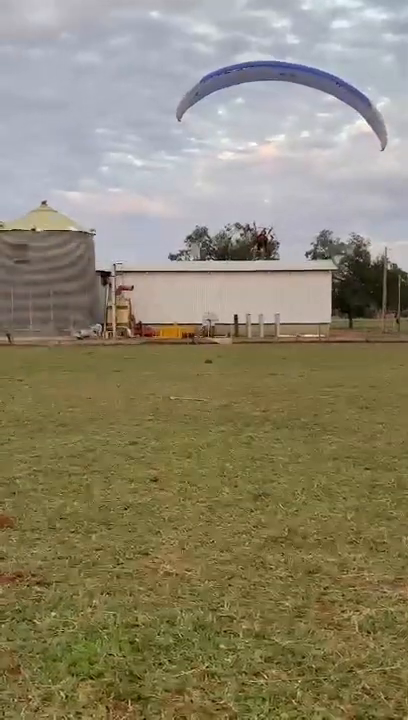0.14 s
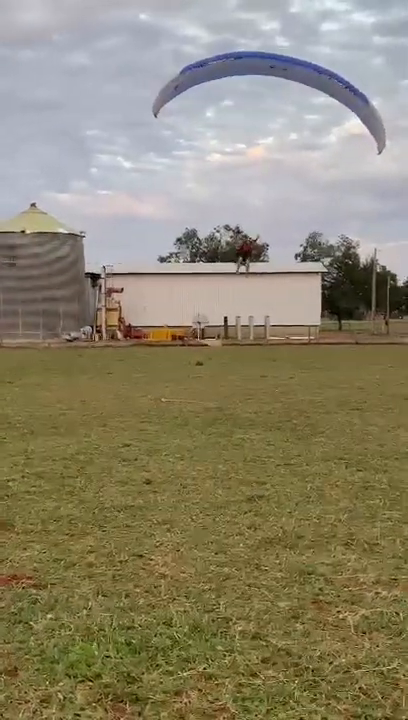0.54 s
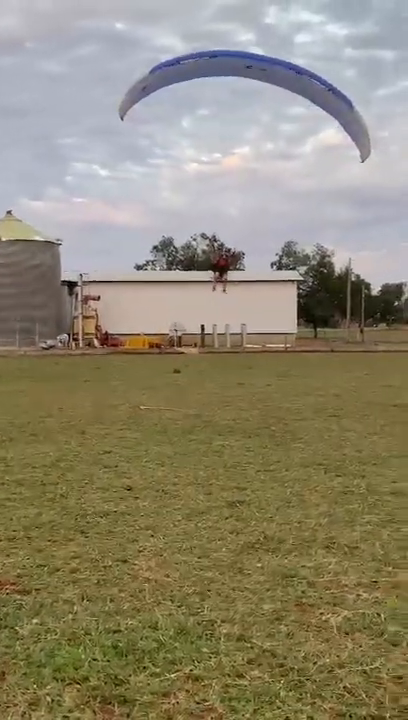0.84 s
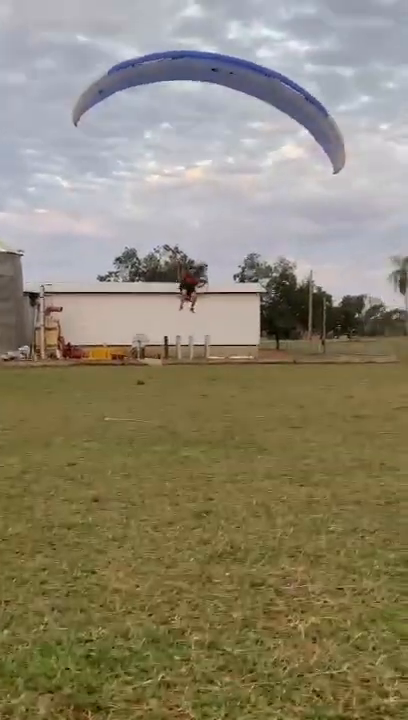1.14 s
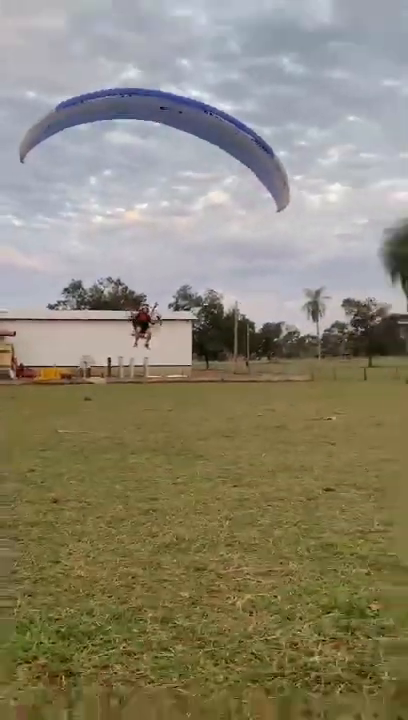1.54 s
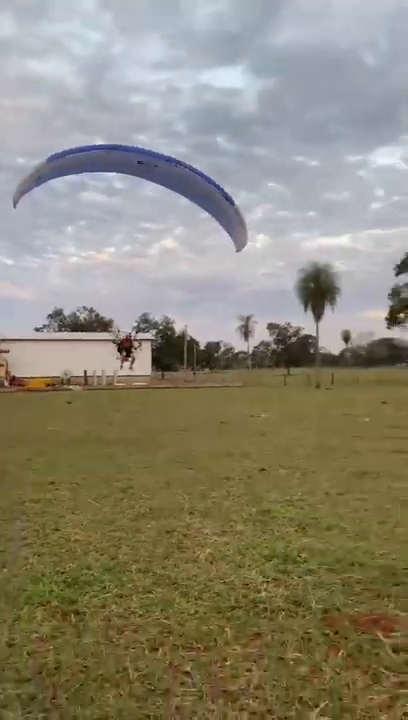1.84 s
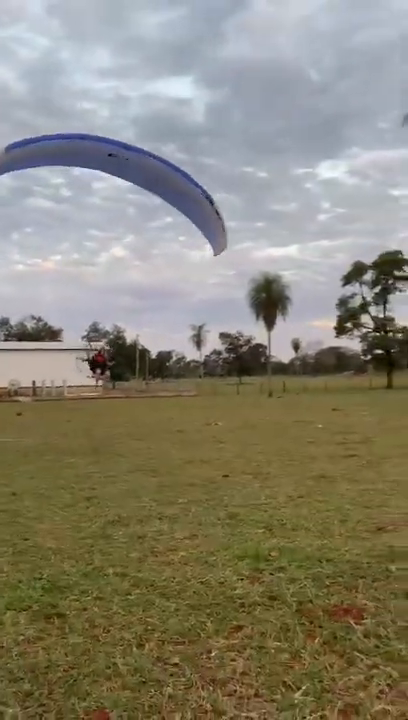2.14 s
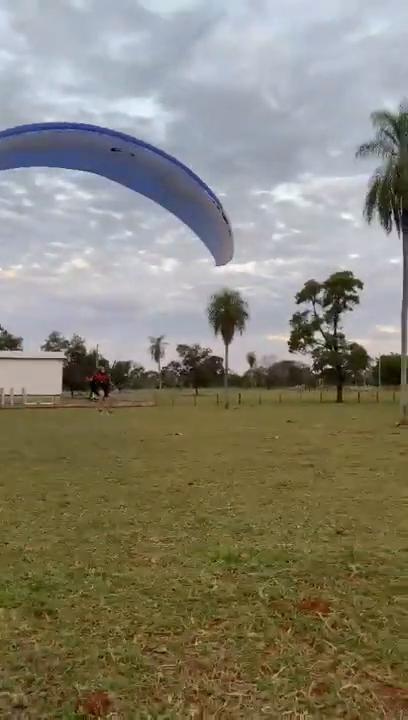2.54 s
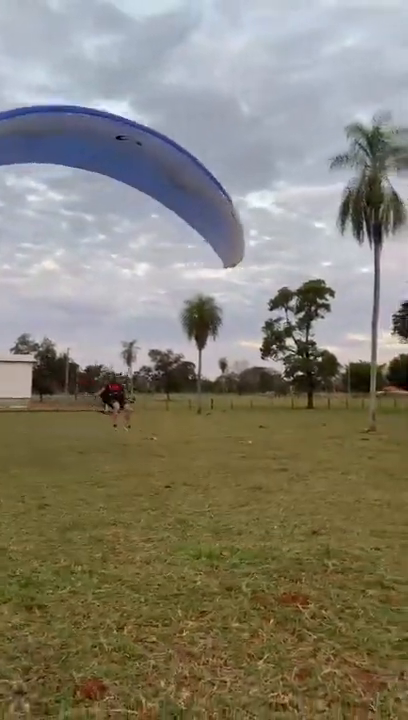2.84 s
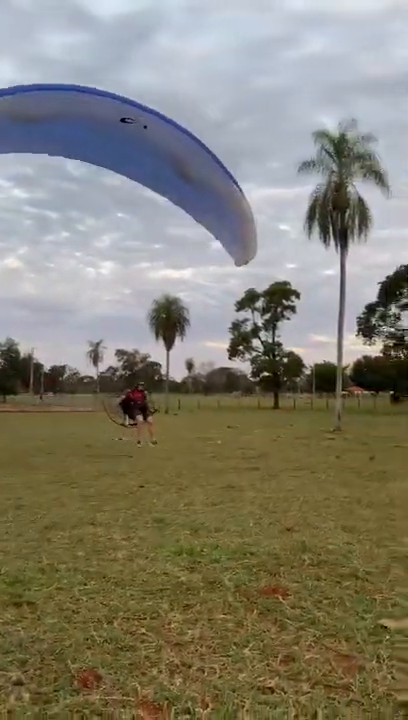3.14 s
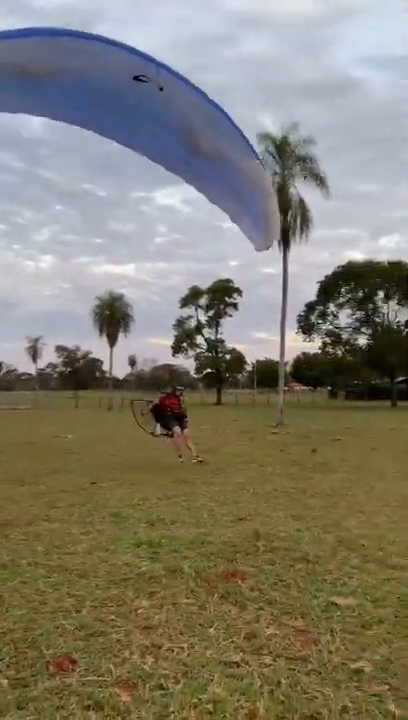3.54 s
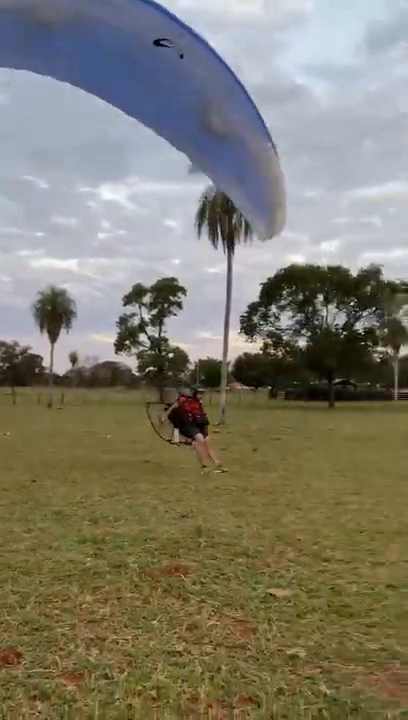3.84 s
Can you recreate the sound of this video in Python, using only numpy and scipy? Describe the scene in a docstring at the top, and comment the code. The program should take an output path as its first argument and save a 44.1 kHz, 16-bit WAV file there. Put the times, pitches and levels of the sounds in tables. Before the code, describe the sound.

A paramotor's small two-stroke engine hums unevenly far off, then swells into a loud buzzing drone

```python
"""A low rush and hum throb at an uneven idle, then swell as a powered paraglider glides in low over a grass field.
Its small two-stroke revs and sags: sine orders of the crank, one uneven pulse a turn, air noise puffing with it.
Far and near filters colour the rush by the bounce off the ground; hard firings ring the exhaust pipe.
A second motor (a guess) revs up twice as sine orders; whooshes, hiss and a chirr are shaped noise."""
import sys
import numpy as np
from scipy import signal
from scipy.fft import rfft, irfft, next_fast_len
from scipy.io import wavfile
from scipy.ndimage import uniform_filter1d, map_coordinates

SR = 44100
rng = np.random.default_rng(int(sys.argv[2]) if len(sys.argv) > 2 else 0)


def natural_amplitude(level_db):
    """Convert a level in decibels to a linear amplitude factor, elementwise."""
    exponent = np.asarray(level_db, float) / 20
    return 10 ** exponent


def master_out(mix):
    """Clip the mix to full scale and print it as 16-bit PCM to the path in sys.argv[1]."""
    frames = np.transpose(np.atleast_2d(mix))
    ceiling = np.clip(frames, -1, 1)
    pcm = np.round(ceiling * 32767).astype(np.int16)
    wavfile.write(sys.argv[1], SR, pcm)


N = 176400
T = np.arange(N) / SR

# crank speed and order levels: start_s, turns_hz, first_db, second_db, fourth_db, orders_3_5_6_7_db
CRANK = [(0, 40.01, -56.5, -49.5, -71, -83), (1.0, 41.89, -64, -56.5, -54.5, -59),
         (1.35, 45.4, -63, -62, -67, -55.5), (1.72, 42.91, -51, -47.5, -57.5, -52),
         (2.25, 45.75, -52, -60, -60, -53), (2.52, 47.53, -57, -62, -72, -50),
         (2.66, 60.47, -57, -42, -66, -50), (2.8, 65.46, -32.5, -38, -48.5, -52),
         (3.07, 69.62, -28.5, -36.5, -46.5, -45), (3.25, 68.38, -26, -35, -44, -46.5),
         (3.3, 65.89, -26, -30, -44, -40), (3.35, 63.12, -41.5, -50, -37, -59),
         (3.65, 52.88, -45, -36, -41, -48), (3.85, 51.14, -35.5, -36, -41.5, -42.5),
         (4, 45.9, -62, -59, -32, -37.5)]
# mean level of the rush by band: start_s, bass_db, middle_db, upper_middle_db, treble_db
RUSH = [(0, -46, -64.5, -65.5, -76), (.75, -46, -62.5, -64, -75.5), (.85, -45, -62.5, -60.5, -68.5),
        (1.1, -42.5, -60, -61.5, -73), (1.5, -42.5, -58.5, -61.5, -68), (1.95, -42.5, -61, -59.5, -72),
        (2.2, -41, -59.5, -55, -59.5), (2.5, -40.5, -56.5, -55, -61), (2.62, -38, -52, -52.5, -52),
        (2.8, -35, -47.5, -49.5, -54.5), (3.1, -39, -46.5, -43.5, -51), (3.3, -29.5, -38, -44.5, -53),
        (3.55, -35.5, -40, -49, -52), (3.7, -32, -43, -47.5, -52.5), (4, -34, -44.5, -51, -56)]
# edges between the four rush bands: edge_hz
EDGES_HZ = [480, 1250, 2400]
# shaft orders sounded as sines: order
ORDERS_HEARD = (1, 2, 4)


def unit(x):
    """Rms one along time."""
    return x / np.sqrt(np.mean(x ** 2, -1, keepdims=True) + 1e-20)


def along(points, hz):
    """Columns read on a log-frequency axis."""
    f, *cols = np.transpose(points)
    return [np.interp(np.log(hz + 1), np.log(f + 1), c) for c in cols]


def curves(rows):
    """One value per sample for each column after the time."""
    s, *cols = np.transpose(rows)
    return [np.interp(T, s, c) for c in cols]


def wobble(rate_hz):
    """A smooth random curve, rate_hz knots a second."""
    knots = rng.standard_normal(int(N * rate_hz / SR) + 4)
    return map_coordinates(knots, [T * rate_hz])


def filtered(x, response):
    """x times a complex response of frequency."""
    m = 2 * next_fast_len(N // 2 + 4096)
    return irfft(rfft(x, m) * response(np.fft.rfftfreq(m, 1 / SR)), m)[..., :N]


def causal(gain):
    """Minimum-phase response of a gain curve, by folding its cepstrum."""
    cep = irfft(np.log(gain + 1e-6))
    cep[1:len(cep) // 2] *= 2
    cep[len(cep) // 2 + 1:] = 0
    return np.exp(rfft(cep))


def patchy(patchy_db):
    """Two noises sharing time-frequency patches of random gain, rms one."""
    z = signal.stft(rng.standard_normal((2, N)), nperseg=512)[2]
    field = uniform_filter1d(rng.standard_normal(z.shape[1:]), size=6, axis=0)
    field = uniform_filter1d(field, size=10, axis=1)
    patched = z * natural_amplitude(patchy_db * field / field.std())
    return unit(signal.istft(patched, nperseg=512)[1][:, :N])


def sine(phase):
    """Sine of rms one."""
    return np.sqrt(2) * np.sin(phase)


def orders(rows, waver_db):
    """Orders of a turning shaft as sines of unsteady level, sounding within the table's span."""
    hz, *levels = curves(rows)
    turn_rad = 2 * np.pi * np.cumsum(hz) / SR
    tone = 0
    for k, db in zip(ORDERS_HEARD, levels):
        tone = tone + natural_amplitude(db + waver_db * wobble(14)) * sine(k * turn_rad + rng.uniform(0, 2 * np.pi))
    return tone * (T >= rows[0][0]) * (T <= rows[-1][0])


def nearness():
    """Approach of the craft as a logistic curve: 0 far, 1 near."""
    half_way_s, time_scale_s = 2.465, 0.29
    return 1 / (1 + np.exp(-(T - half_way_s) / time_scale_s))


def speed():
    """Crank speed from 0 at a faint idle to 1 at full revs."""
    faint_hz, full_hz = 30, 68
    return np.clip((curves(CRANK)[0] - faint_hz) / (full_hz - faint_hz), 0, 1)


def hum():
    """A far, unsteady hum: sine lines wavering in pitch and level."""
    # hum lines: mean_pitch_hz, mean_level_db
    lines = [(62, -51), (121, -52)]
    out = 0
    for hz, db in lines:
        level = natural_amplitude(db + 2.1 * wobble(6.64))
        out = out + level * sine(2 * np.pi * hz * np.cumsum(1 + 0.01479 * wobble(4)) / SR)
    return out


def whooshes():
    """Short whooshes of air: band noise, two channels, under Gaussian swells."""
    # swells: centre_s, sigma_s, centre_hz, peak_level_db
    swells = [(0.9, 0.054, 2570, -66), (2.231, 0.027, 2400, -49), (2.373, 0.013, 2500, -52.5),
              (3.748, .02, 2000, -51.5)]
    sigma_octaves = .22
    out = 0
    for s, sigma_s, hz, db in swells:
        band = lambda f: np.exp(-(np.log2((f + 1) / hz) / sigma_octaves) ** 2 / 2)
        swell = natural_amplitude(db) * np.exp(-((T - s) / sigma_s) ** 2 / 2)
        out = out + swell * unit(filtered(rng.standard_normal((2, N)), band))
    return out


def hiss():
    """High patchy noise whose level follows the treble of the rush."""
    # hiss spectrum: pitch_hz, relative_db
    spectrum = [(3240, -61), (5500, -18.5), (5880, -1.5), (7000, 3.5), (9000, -10.5), (10000, -57)]
    below_treble_db = 4.5
    noise = unit(filtered(patchy(patchy_db=1.5)[0], lambda f: natural_amplitude(along(spectrum, f)[0])))
    return natural_amplitude(curves(RUSH)[3] - below_treble_db + 1.2 * wobble(15)) * noise


def chirr():
    """A pulsing treble chirr, perhaps an insect: narrow noise under an uneven beat."""
    # chirrs: start_s, length_s, level_db
    bursts = [(2.68, .03, -52), (2.8, 0.031, -49), (2.86, .04, -53), (3.345, .07, -45),
              (3.44, 0.245, -47.5), (3.8, .11, -47.5)]
    centre_hz, sigma_hz, mean_beat_hz = 7200, 380, 60
    on = sum(natural_amplitude(db) * (T > s) * (T < s + length_s) for s, length_s, db in bursts)
    on = uniform_filter1d(on, size=SR // 100)
    beat = np.cos(np.pi * mean_beat_hz * np.cumsum(1 + .1 * wobble(20)) / SR) ** 2
    beat = beat * natural_amplitude(2.5 * wobble(30))
    band = lambda f: np.exp(-((f - centre_hz) / sigma_hz) ** 2 / 2)
    return on * unit(beat) * unit(filtered(rng.standard_normal(N), band))


def second_motor():
    """Perhaps a second motor: shaft orders that rev up twice."""
    # first rev: start_s, turns_hz, first_order_db, second_order_db
    rev_one = [(2.0, 51.4, -44.5, -65), (2.19, 71.96, -42, -64), (2.38, 100.2, -35.5, -47.5),
               (2.54, 118.2, -33.5, -58), (2.6, 122.4, -64, -82)]
    # second rev: start_s, turns_hz, first_order_db, second_order_db, fourth_order_db
    rev_two = [(3.02, 68.12, -67.5, -60.5, -77), (3.1, 76.9, -53, -35, -44), (3.2, 90.3, -31.5, -33.5, -44),
               (3.31, 108.5, -36.5, -35.5, -42.5), (3.5, 102.1, -37.5, -39, -48.5),
               (3.6, 97.86, -35, -52, -52.5), (3.8, 96.03, -53, -43, -50.5),
               (4.0, 95.53, -37.5, -42.5, -73)]
    return orders(rev_one, waver_db=.8) + orders(rev_two, waver_db=1.1)


def pops():
    """Hard firings: each rings the pipe modes anew with a noise crack, higher and shorter-ringing when near."""
    # hard exhaust pops: start_s, relative_db
    firings = [(0.969, -47), (1.063, -44), (1.423, -48), (1.51, -44), (1.669, -44), (1.878, -47),
               (2.073, -45), (2.207, -45), (2.355, -42), (2.569, -38), (2.608, -34), (2.642, -32),
               (2.675, -31), (2.708, -29), (2.74, -30), (2.771, -33)]
    # pipe modes: pitch_hz when far, relative_db, t60_s when far
    pipe = [(310, -6, .03), (610, -3, .026), (740, 0, .028), (1500, -6, .018)]
    boost_db, near_rise = 6.5, .34
    crack_db, crack_t60_s, rise_s = -11, .01, .0022
    out, t, near = np.zeros(N + SR), np.arange(SR // 16) / SR, nearness()
    for s, db in firings:
        start = round(s * SR)
        rise = 1 + near_rise * near[start]
        ring = 0
        for hz, mode_db, t60_s in pipe:
            level = natural_amplitude(mode_db + rng.normal(0, 2) - 60 * t * rise ** 2 / t60_s)
            ring = ring + level * np.sin(2 * np.pi * hz * rise * rng.normal(1, .025) * t)
        crack = uniform_filter1d(rng.standard_normal(len(t)), size=5)
        crack = crack * natural_amplitude(crack_db - 60 * t / crack_t60_s)
        out[start:][:len(t)] += natural_amplitude(db + boost_db) * (ring + crack) * (1 - np.exp(-t / rise_s))
    return out[:N]


def stack():
    """Higher crank orders on one shared level; the later in the table, the more they fall when near."""
    # stacked orders: order, relative_db when far
    stacked = [(3, 1), (5, 2), (6, 1), (7, 2)]
    near_fall_db = 5.5  # per row
    hz, *_, level_db = curves(CRANK)
    turn_rad = 2 * np.pi * np.cumsum(hz) / SR
    out = 0
    for i, (k, db) in enumerate(stacked):
        level = natural_amplitude(level_db + db - near_fall_db * i * nearness() + 1.2 * wobble(8))
        out = out + level * sine(k * turn_rad + .15 * wobble(12))
    return out


def buzz():
    """A few high crank orders that stand clear of the rush at full revs."""
    # clean high orders at full speed: order, db_against_middle_of_rush
    high_orders = [(10, -10), (12, -12), (14, -10), (15, -12)]
    turn_rad = 2 * np.pi * np.cumsum(curves(CRANK)[0]) / SR
    out = 0
    for k, db in high_orders:
        level = natural_amplitude(curves(RUSH)[1] + db + 3 * wobble(7))
        out = out + level * sine(k * turn_rad + .6 * wobble(14))
    return speed() ** 8 * out


def rush():
    """One uneven pulse a turn and air noise puffing with it, by band; row 1 is scattered noise alone."""
    # far colour: pitch_hz, relative_db
    far_colour = [(20, -26), (32, -16), (60, 1.5), (120, 1.5), (300, -8.5), (345, -14.5), (494, -40),
                  (756, -28), (1190, -42), (1500, -33), (2100, -41.5), (5300, -31.5), (6400, -42),
                  (7190, -85), (9230, -41), (11800, -51)]
    # near colour: pitch_hz, relative_db
    near_colour = [(20, -30), (32, -16), (92, -5), (206, -10), (395, -18), (533, -36), (680, -23),
                   (996, -16), (1250, -34), (1860, -31), (2600, -42), (6500, -52), (7800, -78.5),
                   (9300, -56), (11800, -62)]
    # depth of the noise swell once a turn, per band: depth_0_to_1
    gate_depth = [.1, .45, .38, .22]
    # firing pulses' share of power at full speed, per band: share_0_to_1
    pulse_share = [.3, .45, .25, 0]
    size_spread_db, jitter_turns, puff_decay_per_turn = 2.2, .006, 1
    hz, levels, near = curves(CRANK)[0], curves(RUSH), nearness()

    turns = np.cumsum(hz) / SR + jitter_turns * wobble(40)
    at = np.flatnonzero(np.diff(np.floor(turns)) > 0)
    size_db = size_spread_db * rng.standard_normal(len(at))
    pulses = np.zeros((2, N))
    pulses[0, at] = natural_amplitude(size_db) / np.sqrt(hz[at])  # even power at any speed
    puff = unit(np.exp(-puff_decay_per_turn * (turns % 1)) * natural_amplitude(np.interp(T, at / SR, size_db)))

    air, flutter = patchy(patchy_db=1.5), wobble(9)
    edges_hz = [1e-3, *EDGES_HZ, SR]
    out = 0
    for k, db in enumerate(levels):
        share, depth = pulse_share[k] * speed() ** k, gate_depth[k]
        puffing = unit(air * (1 - depth + depth * puff))
        drive = np.sqrt(1 - share) * puffing + np.sqrt(share) * unit(pulses)
        drive[1] = air[1]

        def band(f):
            low_cut = 1 + (edges_hz[k] / (f + 1)) ** 12
            high_cut = 1 + (f / edges_hz[k + 1]) ** 12
            return 1 / np.sqrt(low_cut * high_cut)

        far_part = unit(filtered(drive, lambda f: causal(natural_amplitude(along(far_colour, f)[0]) * band(f))))
        near_part = unit(filtered(drive, lambda f: causal(natural_amplitude(along(near_colour, f)[0]) * band(f))))
        level = natural_amplitude(db + .6 * wobble(8) + .5 * k * near * flutter)
        out = out + level * ((1 - near) * far_part + near * near_part)
    return out


def stereo(mid, scatter):
    """Microphone pair: the side is partly a phase-shifted mid, partly scatter; hiss and chirr in antiphase."""
    # side signal: pitch_hz, side_over_mid_db, likeness_to_mid_0_to_1, side_lead_rad
    pair = [(120, -19, 0.69, 2.5), (250, -11, 1, 2), (418, -1.5, 0.98, 1.9), (563, 3, 0.5, 0.7),
            (704, -4.5, 0.82, 0.5), (1010, 1.5, 1, 0.77), (1300, 1.5, 0.62, 0.72), (1700, -7.5, 0.58, -0.4),
            (2900, 1, 0, 0.2), (4800, -5.5, 0.1, 3), (9000, -29, 0.06, 1.5)]
    far_side_db = -16.5  # above the upper middle

    def to_side(f):
        db, alike, lead_rad = along(pair, f)
        alike = np.clip(alike, 0, 1)
        return natural_amplitude(db) * np.array([alike * np.exp(1j * lead_rad), np.sqrt(1 - alike ** 2)])

    side = filtered(np.array([mid, scatter]), to_side).sum(0)
    high = filtered(side, lambda f: 1 / (1 + (EDGES_HZ[2] / (f + 1)) ** 6))
    side = side - high * (1 - natural_amplitude(far_side_db * (1 - nearness())))
    side = side + hiss() + chirr()
    return np.array([mid + side, mid - side])


def scene():
    """All sources summed into the mid, then spread to two channels."""
    mid, scatter = rush() + whooshes()
    mid = mid + hum() + second_motor() + pops() + stack() + buzz() + orders(CRANK, waver_db=1.1)
    return stereo(mid, scatter)


def low_pass(x):
    """Removes everything above the highest recorded frequency."""
    return signal.sosfilt(signal.butter(12, 12000, fs=SR, output="sos"), x)


def record(dry):
    """The finished mix as the phone keeps it."""
    return low_pass(dry)


dry = scene()
out = record(dry)
master_out(out)
```